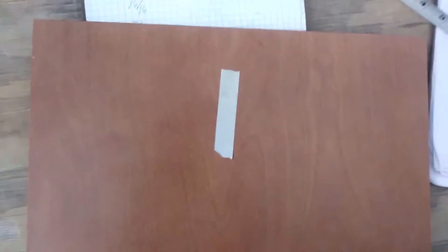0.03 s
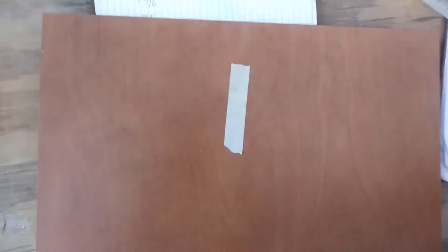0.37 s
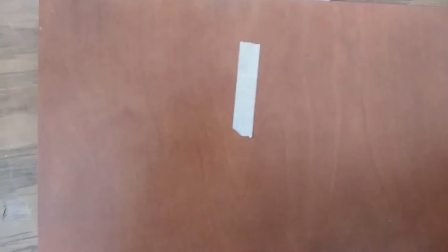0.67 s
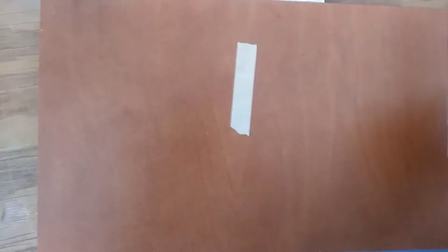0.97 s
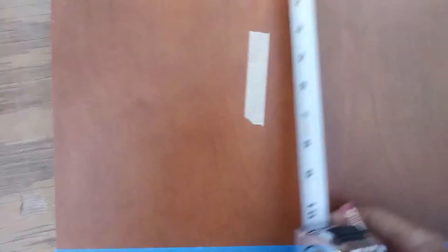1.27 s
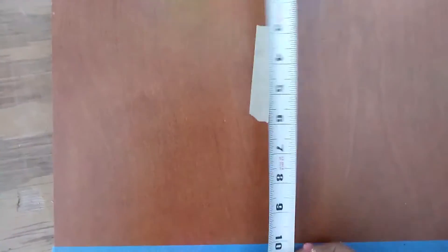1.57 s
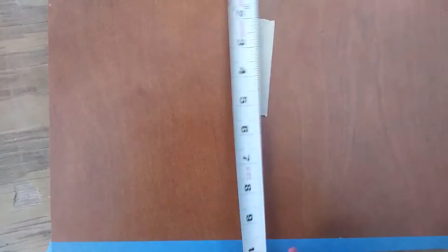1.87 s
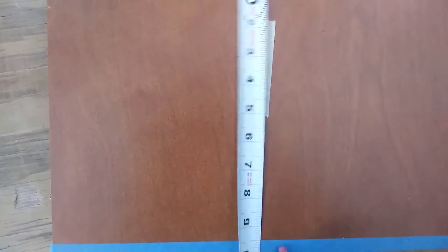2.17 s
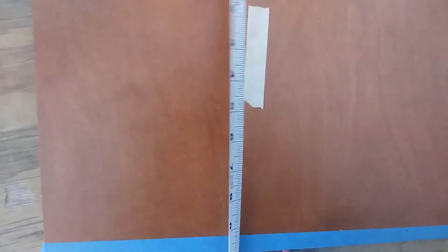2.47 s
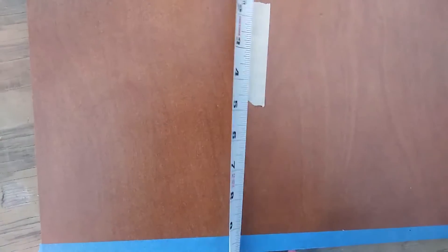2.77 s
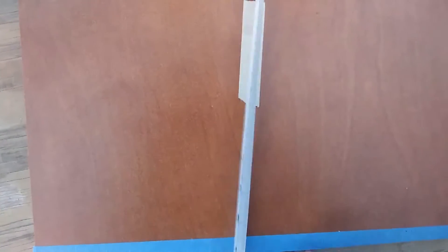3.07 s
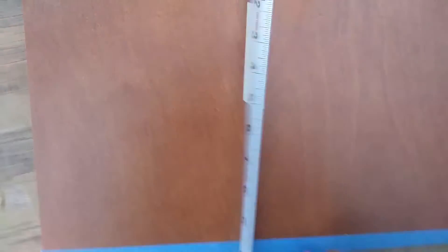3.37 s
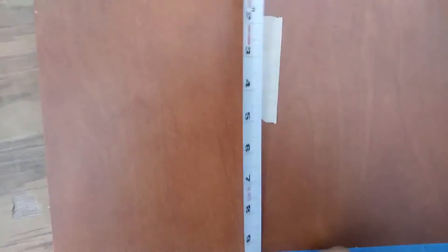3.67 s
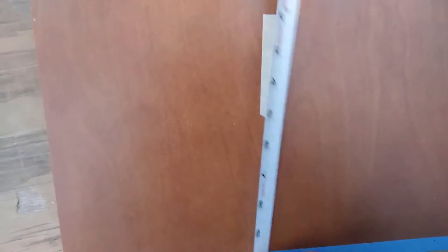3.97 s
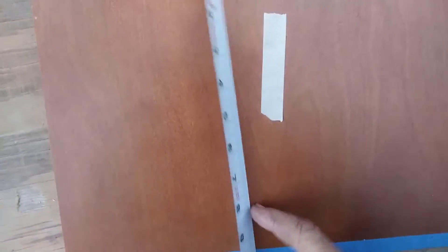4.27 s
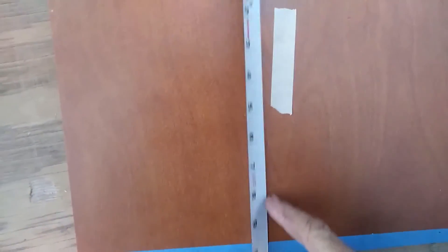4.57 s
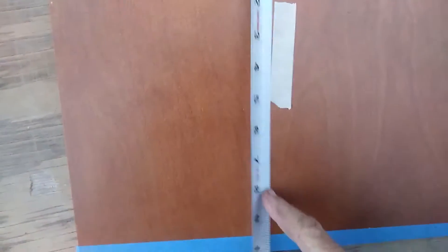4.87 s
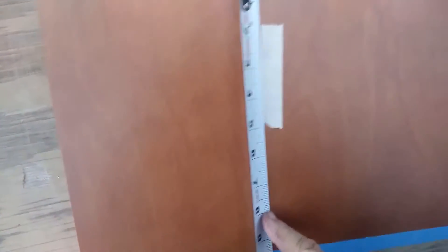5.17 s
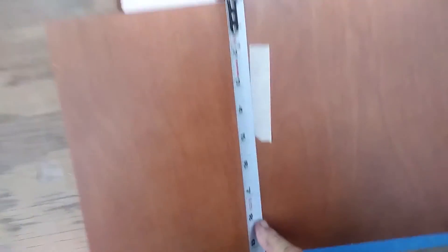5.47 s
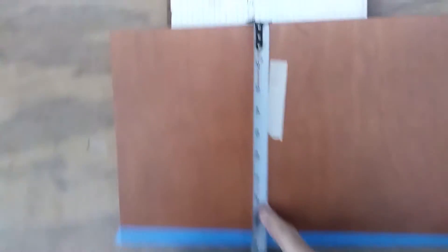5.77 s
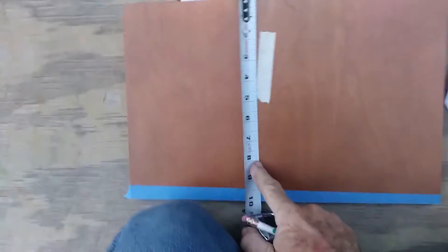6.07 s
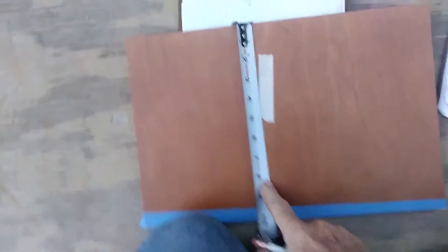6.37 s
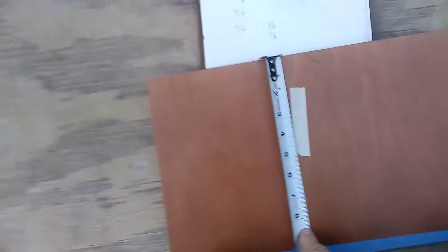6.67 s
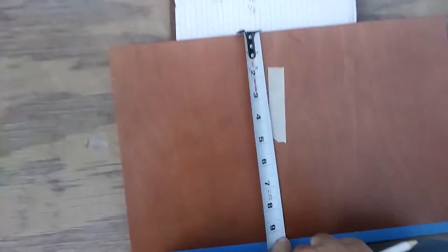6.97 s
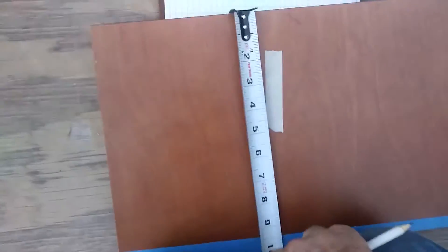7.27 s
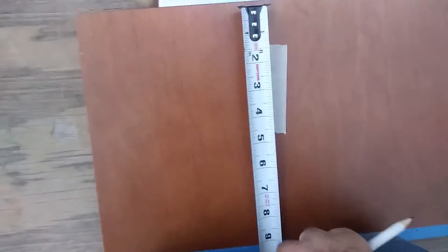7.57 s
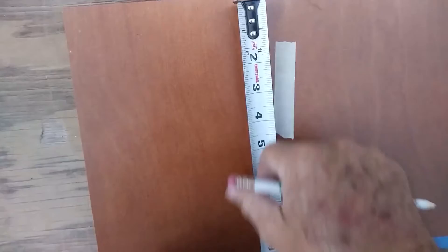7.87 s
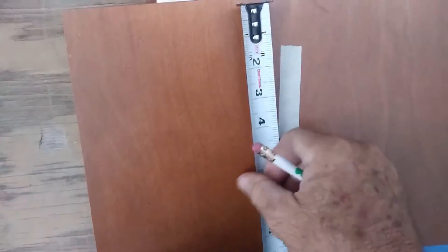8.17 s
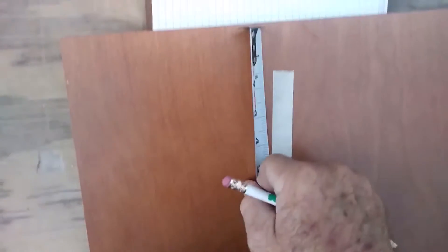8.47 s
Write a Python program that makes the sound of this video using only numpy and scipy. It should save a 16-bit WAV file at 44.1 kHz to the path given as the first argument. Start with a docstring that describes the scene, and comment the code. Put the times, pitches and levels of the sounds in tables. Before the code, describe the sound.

A steel tape measure is pulled out and shifted across a wooden board, with rustling, scraping and sharp metallic snaps.

```python
"""Workshop, close by: a steel tape measure is pulled out and shifted about on a wooden board.
The reel ticks and rings its spring; the arched blade buckles with sharp snaps and flutters as it bends.
Its edges scrape, crackle and squeak by stick-slip, and click against the case.
Case and hand knock and rub on the wood, ringing its low modes, over a faint room hum."""
import sys
import numpy as np
from scipy import signal
from scipy.fft import rfft, irfft
from scipy.io import wavfile
from scipy.ndimage import uniform_filter1d

SR = 44100
rng = np.random.default_rng(int(sys.argv[2]) if len(sys.argv) > 2 else 0)


def store_wav(level_fs):
    """Save 16-bit WAV to argv[1]."""
    pcm = np.round(np.clip(np.atleast_2d(level_fs), -1, 1) * 32767)
    wavfile.write(sys.argv[1], SR, pcm.T.astype(np.int16))


N = 384993
TIME_S, FREQ_HZ = np.arange(N) / SR, np.fft.rfftfreq(N, 1 / SR)
EVENT_N = SR // 4
AGE_S, EVENT_HZ = np.arange(EVENT_N) / SR, np.fft.rfftfreq(EVENT_N, 1 / SR)
ATTACK_S = 0.015  # friction onset

# Blade buckles: (time [s], ring [dB], hardness [dB], clash level [dB], brightness [dB], favoured [Hz])
BLADE_SNAPS = [(1.7975,-17,3.5,-11.5,0,680), (1.8161,-26,-9,-20,-4,680), (2.863,-16.5,4.5,-16,-10.5,1840),
               (2.9271,-33.5,5.5,-49,-27,694), (2.988,-28.5,5,-28.5,5,740), (3.162,-36.5,2.5,-44,-1,865),
               (3.288,-35,-12,-61,2,680), (3.8668,-14,8,-20.5,-10,1004), (3.886,-29.5,3.5,-37.5,15,960),
               (3.8966,-48,6,-49.5,-8,3130), (3.909,-35,13.5,-44.5,-19,2950), (3.9235,-41,2.5,-34,-8,1815),
               (4.028,-20,9,-21.5,-7.5,960), (4.506,-30,4.5,-55.5,-15,740), (4.519,-33,1,-57.5,-15,765),
               (4.5652,-32,-2,-30.5,0,720), (4.6204,-32,2.5,-42,-6,690), (4.688,-16.5,0,-18,1,830),
               (4.7386,-24.5,1,-15,0,694), (4.768,-31.5,3.5,-45.5,-1,863), (7.3597,-33.5,-3,-38,-17,852)]
# Hook and edge hit case and board: (time [s], level [dB], brightness [dB], case ring level [dB])
EDGE_CLICKS = [(0.4538,-30,-10.5,-58), (0.515,-54,-15,-36), (0.5535,-29,-5,-20.5), (0.5795,-31,-6,-38),
               (0.6952,-41.5,9,-32), (0.7164,-34,-30,-35), (0.8012,-28,7,-18), (0.822,-34,6,-46),
               (1.113,-27,8,-61), (1.3139,-37.5,-26,-64), (1.3775,-34.5,8,-64), (1.387,-36,8,-62),
               (1.539,-36.5,-9,-58), (1.711,-36,-8,-45), (1.8957,-24,9,-59), (1.903,-23,5,-55),
               (2.1209,-28,7,-38), (2.2318,-30,16,-27.5), (2.4551,-38,-9,-42.5), (2.6942,-48,-7,-42.5),
               (2.7393,-44.5,-12,-44), (3.1905,-34.5,0,-60), (3.2003,-28,5,-62), (3.2207,-23,7,-51),
               (3.2274,-23,-3,-27), (3.363,-49.5,5,-45), (3.4353,-25,5.5,-27), (3.517,-43,-3,-42),
               (3.8323,-35,2,-48), (4.0082,-40,-6,-47), (4.123,-29,1,-52), (4.365,-17,1,-65),
               (4.725,-26,-1,-62), (4.754,-20,1,-34), (4.9575,-29.5,-1,-29), (5.4848,-64.5,-16,-35),
               (6.157,-44,-12.5,-31.5), (6.4548,-66,-33,-41), (6.479,-45.5,-28,-48), (6.6104,-38.5,-32,-32),
               (6.7155,-52.5,-16,-43), (7.2516,-44.5,-1,-51.5), (7.2885,-56,-16,-40.5),
               (7.3766,-24.5,12,-41), (7.3848,-28.5,4,-65), (7.3975,-33,3,-53), (7.4056,-22,6,-36),
               (7.423,-26,5,-54), (7.481,-30.5,2,-43), (7.5222,-37,-3,-40), (7.605,-49.5,-15,-55),
               (7.6972,-46.5,-9,-51), (7.72,-47,-8,-52.5), (7.9392,-34,0,-42.5), (8.0957,-32,-29,-32),
               (8.1031,-27.5,-19,-24.5), (8.1125,-35.5,-20,-33.5), (8.2945,-41,-13,-20.5),
               (8.305,-31.5,-15,-29), (8.6042,-33.5,-1,-28.5), (8.628,-40.5,6,-39)]
# Reel ticks: (time [s], level [dB])
REEL_TICKS = [(0.8811,-27), (0.9086,-27.5), (0.93,-34), (0.9577,-29), (0.9878,-26.5), (1.018,-33),
              (1.0488,-26), (1.0784,-28.5), (1.103,-33), (1.133,-39), (1.1606,-30), (1.193,-31.5),
              (1.2577,-35.5)]
# Brief, clear tones near the end: (time [s], level [dB], favoured [Hz])
SHORT_TONES = [(8.225,-61,4630), (8.6092,-33,940), (8.613,-47,4550), (8.626,-37.5,4600), (8.7067,-41.5,680),
               (8.716,-41,4200)]
# Edge sticks and sings: (time [s], length [s], level [dB], pitch [Hz])
EDGE_CHIRPS = [(0.606,0.039,-42,3840), (0.671,0.0037,-36,3940), (1.374,0.015,-33,9460)]
# Blows on the board: (time [s], level [dB], favoured [Hz], push [s])
BOARD_KNOCKS = [(0.4621,-42,490,0.00067), (0.552,-49,280,0.001), (1.7985,-28,451,0.0023),
                (2.8635,-33.5,415,.0004), (3.857,-38.5,285,0.0071), (4.331,-34,283,0.0037),
                (4.365,-37,273,0.0016), (4.4526,-38,276,0.0085), (4.69,-42.5,215,.0005),
                (4.835,-38,285,0.0083), (4.954,-45,285,0.0087), (5.056,-43.5,610,0.00094),
                (5.164,-38,277,0.0042), (6.036,-44.5,480,0.00095), (6.265,-47,250,0.00069),
                (6.455,-27,300,0.00016), (6.478,-38,362,0.00082), (8.7063,-39.5,560,0.00019)]
# Pushes and pulls of the tape, levels at mid-stroke: (time [s], length [s], scrape [dB], flex [dB],
# rub [dB], swell over the stroke [dB], edge brightness [dB], squeak share [0-1])
TAPE_STROKES = [(0.44,0.16,-44.5,-76,-43,-3,-9,0.07), (0.623,0.019,-39.5,-35.5,-40,-1.5,-8,0),
                (0.686,0.17,-54.5,-48,-52,7,0,0), (0.873,0.44,-64,-52.5,-60,-16,-32,0.1),
                (1.265,0.032,-48,-58,-62,15,-6,0), (1.367,0.029,-43.5,-50,-48.5,2.5,-15,0),
                (1.443,0.024,-41.5,-44.5,-37,-1,-8,0.12), (1.503,0.079,-44,-50,-55,0,-12,0.2),
                (1.578,0.15,-67,-56.5,-66.5,-2,-16,0.33), (1.755,0.028,-49.5,-58,-60,6.5,-2.5,0.4),
                (1.802,0.15,-34,-34,-38.5,3,-4,0.03), (1.984,0.14,-44,-41,-45.5,10.5,-1,0.32),
                (2.206,0.14,-45.5,-37,-54,2,0.5,0), (2.367,0.037,-44,-53,-68,7.5,-14,0.14),
                (2.49,0.23,-65.5,-65.5,-73,3,-11,0.1), (2.757,.015,-57.5,-49.5,-63.5,-2.5,-6.5,0.4),
                (2.923,0.17,-46.5,-28.5,-62,3.5,1,0.26), (3.132,0.029,-66,-43.5,-53,4,-7,0.4),
                (3.19,0.054,-38,-43,-47,5.5,-20,0.27), (3.282,0.023,-49,-32.5,-28,-22,4,0),
                (3.349,0.25,-56,-53.5,-53,2,-5,0), (3.637,0.16,-75,-68.5,-70,0.5,-8,0.5),
                (3.81,0.028,-42,-50.5,-53,11,-25,0.2), (3.861,0.044,-53,-29,-41,-16,0,0.8),
                (4.089,0.028,-37.5,-38,-43,-3,-5,0.1), (4.12,0.059,-35,-43,-49,1,0,0.03),
                (4.185,0.021,-38.5,-43,-57.5,-4,-3,0.1), (4.22,0.02,-32,-43.5,-52,-7,0,0),
                (4.267,0.047,-39.5,-48,-50,-13,-7,0), (4.322,0.062,-37,-39,-46,7.5,-0.5,0),
                (4.431,0.17,-51.5,-53,-54,16,-13,0), (4.749,0.073,-52,-32,-64,-14,12,0),
                (4.819,0.031,-41,-55,-39.5,3,-8,0), (4.842,0.13,-39.5,-41,-45.5,-5,-12,0),
                (5.07,0.14,-53,-38,-47,3.5,-6.5,0.24), (5.392,0.12,-64.5,-49,-49.5,-1.5,0,0.2),
                (5.94,0.056,-66,-50.5,-46.5,6,-10,0.2), (6.008,0.24,-59.5,-42.5,-40,1,-6,0.2),
                (6.468,0.1,-70,-49,-47,-13,-2,0.35), (6.6,0.078,-62.5,-52,-56,3.5,-4,0),
                (7.225,0.042,-56.5,-53,-50.5,4.5,0,0.23), (7.371,0.18,-29.5,-58,-54,-17,-17,0.35),
                (7.933,0.011,-38,-41.5,-60,-2,-13,0.64), (8.136,0.079,-46,-54,-57,11,-3,0.54),
                (8.244,0.044,-38,-54,-53,-1.5,-9,0.3), (8.365,0.049,-71,-47,-66,6,-2,0.1),
                (8.553,0.04,-67,-43,-60,7,2,0.5), (8.625,0.049,-47,-51,-70,-7,-10,0.2),
                (8.705,0.027,-41,-44,-58,-15,-2,0.2)]
SCRAPE_COL, FLEX_COL, RUB_COL, BRIGHT_COL, SQUEAK_COL = 2, 3, 4, 6, 7
# Blade lifted off the wood: (time [s], freely ringing share [0-1])
BLADE_LIFT = [(0.5,0), (1.5,0.47), (1.8,0.9), (2.35,0.86), (2.95,0.83), (3.5,0.85), (4.0,0.96), (4.8,0.9),
              (5.1,0.57), (5.9,0.54), (8.7,0.34)]
# Case slides on the wood: (time [s], level [dB])
SLIDE_ENVELOPE = [(7.357,-62), (7.365,-47), (7.41,-30), (7.45,-40), (7.52,-46.5), (7.58,-58), (7.62,-72)]

# Modes: (frequency [Hz], level [dB], t60 [s])
BLADE_MODES = [(290, -20, .07), (365, -18, .06), (425, -11, .06), (560, -17, .05), (686, 0, .07),
               (765, -6, .07), (865, -4.5, .07), (962, -1.5, .085), (1130, -16, .05), (1360, -6, .055),
               (1410, -13, .05), (1820, -1, .045), (1980, -12, .05), (2300, -17, .04), (2480, -14, .045),
               (2650, -12, .04), (2950, -14, .055), (3135, -12, .05), (3480, -15, .045), (3745, -13, .055),
               (4200, -19, .04), (4430, -19, .045), (4750, -18, .04)]
TONE_MODES = [(396,8.5,0.13), (926,-2.5,0.071), (1400,11,0.032), (3170,-20,0.094), (4200,-1.5,0.1),
              (4750,9,0.035), (5840,4,0.064), (5670,-3,0.084), (6950,0,0.11)]
CASE_MODES = [(380, -0.5, 0.11), (506, -8.5, 0.068), (611, -6, 0.039), (750, -1, 0.035), (1013, -7.5, 0.13),
              (1140, -6.5, 0.032), (1370, -5, 0.077), (1580, -13.5, 0.046), (1600, -18, 0.0071),
              (2130, -5.5, 0.03), (2097, -6.5, 0.048), (2500, -9.5, 0.021)]
SPRING_MODES = [(1752,-4.5,0.054), (2650,-2,0.052), (3860,-1.5,0.11), (5000,-5,.06), (6650,-1,0.05),
                (6500,2.5,0.062), (9620,6,0.031), (9700,0,0.029), (10300,-3,.035), (12600,1,.03)]
BOARD_MODES = [(117.5, -18.5, 0.043), (162, -11, 0.017), (225, -3, 0.13), (280.4, 0.5, 0.11),
               (391, -8.5, 0.13), (452, -10, .06), (550, 0, 0.07), (735, 5.5, 0.17), (930, -11, 0.026)]
# Friction resonances: (frequency [Hz], width [Hz], level [dB])
EDGE_SQUEAK_PEAKS = [(3960, 57, -2.5), (4600, 360, -3), (4770, 290, -7.5), (5890, 84, -8), (6400, 200, -4)]
CASE_SLIDE_PEAKS = [(174,64,-3), (317,92,-3.5), (604,110,3), (904,29,-2), (1274,115,1.5), (2010,150,-1.5)]
# Noise spectra: (frequency [Hz], density [dB])
STEEL_SPECTRUM = [(120,-38.5), (350,-33.5), (900,-18.5), (1600,-10), (2200,-8.5), (3000,-4.5), (4100,0.5),
                  (5400,-4), (6800,-2), (8200,-4.5), (11500,-6.5), (13500,-15), (16000,-15.5)]
DEADENED_BLADE_SPECTRUM = [(120,-43), (300,-8), (500,-4.5), (720,0.5), (950,-1), (1150,-1.5), (1400,-3.5),
                           (1850,-11.5), (2300,-9), (4000,-14), (7000,-46.5), (16000,-54)]
LOOSE_PARTS_SPECTRUM = [(120,-38.5), (210,-15.5), (340,-13.5), (700,-2.5), (1150,1.5), (1650,-7),
                        (2150,-1.5), (2800,-8), (4000,-8.5), (7000,-27.5), (16000,-47.5)]
COIL_SPECTRUM = [(200,-10.5), (600,-10.5), (1000,0.5), (1300,-10), (1700,5), (2500,-7), (4000,4.5),
                 (6000,3), (10000,-18), (16000,-25)]
WOOD_RUB_SPECTRUM = [(30,-42.5), (85,-22.5), (130,-18), (200,-3.5), (300,15.5), (450,14), (700,0),
                     (1500,-33), (4000,-54)]
HUM_SPECTRUM = [(25,4), (70,-18), (110,-12.5), (170,-5), (230,-3), (330,-4), (500,-7), (1000,-6.5),
                (1700,-14.5), (3500,-17.5), (8000,-29), (11500,-27), (16000,-28)]
# Room decay: (frequency [Hz], t60 [s])
ROOM_DECAY = [(200, 0.24), (600, 0.02), (1500, 0.14), (4000, 0.16), (10000, 0.023), (16000, 0.26)]


def snaps(steel, swell_s=0.0027, rise_s=0.003, surge_s=0.013, sing_t60_s=0.24, pick_width_hz=60):
    """The arch pops through: steel clashes, bending modes rattle. Harder snaps are quicker and thinner."""
    out = np.zeros(N)
    hz, mode_db, t60_s = np.transpose(BLADE_MODES)
    for time_s, ring_db, hard_db, clash_db, bright_db, favoured_hz in BLADE_SNAPS:
        picked = np.exp(-((hz - favoured_hz) / pick_width_hz) ** 2)
        picked_db = mode_db + picked * (3.5 - 0.43 * mode_db)  # weak modes gain most
        modes = np.c_[hz, picked_db, t60_s * (1 + 0.45 * picked)]
        body = ring(modes, tilt_db=hard_db - 2.5, scatter_db=1.2, detune=0.006)
        body += amp(-19) * ring(CASE_MODES, detune=0.011)
        body *= chatter(EVENT_N, depth_db=2)
        body *= 1 + 1.8 * np.exp(-AGE_S / surge_s)  # wide first swings
        singing_modes = np.c_[hz, picked_db, np.full(len(hz), sing_t60_s)]
        body += amp(-23) * ring(singing_modes, tilt_db=hard_db - 7, detune=0.002)
        softness = 2 ** (-max(hard_db, -4) / 5)
        body *= 1 - np.exp(-AGE_S / (swell_s * softness))
        corner_hz = np.clip(330 * 2 ** (hard_db / 11), 100, 900)
        body = signal.sosfilt(signal.butter(2, corner_hz, "highpass", fs=SR, output="sos"), body)
        clash_t60_s = 0.077 * 2 ** (-hard_db / 20.5)
        fizz = clash(steel, bright_db, clash_t60_s, crack=0.39, crack_s=0.022)
        fizz *= 1 - np.exp(-AGE_S / (rise_s * softness))
        add(out, time_s, struck(body, ring_db) + struck(fizz, clash_db - 5.5))
    return out


def clicks(steel, rise_s=0.00089, lead_in_s=0.0024, bounce_s=0.0024, spike_s=0.00059, hand_damp_s=0.06):
    """Edge or reel ticks in the steel and bounces on the case. Duller contacts die sooner."""
    out = np.zeros(N)
    pull_speed = np.sin(np.linspace(0, np.pi, len(REEL_TICKS)))
    reel = [(time_s, db, 2.5 + 10 * speed, db - 23) for (time_s, db), speed in zip(REEL_TICKS, pull_speed)]
    for time_s, db, bright_db, case_db in list(EDGE_CLICKS) + reel:
        t60_s = 0.062 * 2 ** (bright_db / 37)
        contact = 1 + 2.3 * np.exp(-AGE_S / spike_s)
        tick = struck(clash(steel, bright_db, t60_s, crack=0.32, crack_s=0.0013) * contact, db)
        bounces = rng.standard_normal(EVENT_N) * np.exp(-AGE_S / bounce_s)
        shell = ring(CASE_MODES, tilt_db=0.057 * bright_db, scatter_db=5, detune=0.073)
        shell *= np.exp(-AGE_S / hand_damp_s)
        case = struck(signal.fftconvolve(bounces, shell)[:EVENT_N], case_db - 12)
        case += struck(clatter(), case_db - 6.5)
        add(out, time_s, (tick + case) * (1 - np.exp(-AGE_S / rise_s)))
        lead_in = struck(clash(steel, bright_db, t60_s), db - 17) * np.exp(-AGE_S / lead_in_s)
        add(out, time_s - EVENT_N / SR, lead_in[::-1])  # a few ms of hiss swell into the tick
    return out


def clash(steel, bright_db, t60_s, crack=0, crack_s=1):
    """High steel modes fizz, with an optional crack. Softer contacts roll off lower."""
    spot_db = ripple_db(points=170, depth_db=3.3)
    shade_db = bright_db * treble(EVENT_HZ, corner_hz=7500 * 2 ** (bright_db / 38))
    fizz = coloured(rng.standard_normal(EVENT_N), lookup(steel, EVENT_HZ) + spot_db + shade_db)
    fade = amp(-60 * AGE_S / max(t60_s, 0.01))
    return fizz * (fade * chatter(EVENT_N, depth_db=4.5) + crack * np.exp(-AGE_S / crack_s))


def steel_colour(step_hz=60, scatter_db=1.8):
    """Crowded high modes of the thin strip: (frequency [Hz], density [dB])."""
    hz = np.arange(20, SR / 2, step_hz)
    return np.c_[hz, lookup(STEEL_SPECTRUM, hz) + scatter_db * rng.standard_normal(len(hz))]


def clatter(rattle_s=0.014, knock_s=0.00042):
    """Loose case parts rattle in a broad, dry burst."""
    spot_db = ripple_db(points=200, depth_db=4)
    rattle = coloured(rng.standard_normal(EVENT_N), lookup(LOOSE_PARTS_SPECTRUM, EVENT_HZ) + spot_db)
    return rattle * (np.exp(-AGE_S / rattle_s) + 8.7 * np.exp(-AGE_S / knock_s))


def coil(rasp_s=0.012, ping_s=0.02, slide_db=-43.5, release_s=0.03):
    """Reel ticks ring the spring; coil turns rasp over one another and keep it ringing."""
    gain, ringing = np.zeros((2, N))
    for time_s, db in REEL_TICKS:
        add(gain, time_s, amp(db - 9.5) * np.exp(-AGE_S / rasp_s))
        ping = ring(SPRING_MODES, scatter_db=1, detune=0.011) * np.exp(-AGE_S / ping_s)
        add(ringing, time_s, struck(ping, db - 8))
    start_s, end_s = REEL_TICKS[0][0], REEL_TICKS[-1][0]
    pull = np.interp(TIME_S, [start_s, start_s + ATTACK_S, end_s - release_s, end_s], [0, 1, 1, 0])
    gain += amp(slide_db) * pull
    friction = slips(per_s=450, spread_db=5, smooth=0.33)
    spring = ring(SPRING_MODES, tilt_db=-3, scatter_db=0.5, detune=0.004)
    singing = unit_rms(excite(friction, spring))
    rasp = bending(coloured(friction, lookup(COIL_SPECTRUM, FREQ_HZ)))
    return ringing + gain * (rasp + amp(-5) * singing)


def scrape(steel, grain_s=0.0053):
    """The blade edge grates on board and case slot, with a thin squeak."""
    grain = rng.standard_normal(EVENT_N) * np.exp(-AGE_S / grain_s)
    power = excite(slips(per_s=700, spread_db=6, smooth=0.93) ** 2, grain ** 2)
    grit = np.sqrt(abs(power)) * rng.standard_normal(N) * chatter(N, depth_db=2)
    rasp = bending(coloured(grit, lookup(steel, FREQ_HZ)))
    squeak = unit_rms(filtered(rasp, resonances(EDGE_SQUEAK_PEAKS)))
    highs = filtered(rasp, treble(FREQ_HZ, corner_hz=7000))
    bite = amp(stroke_setting(BRIGHT_COL))
    rasp = (rasp + (bite - 1) * highs) / np.sqrt(0.73 + 0.078 * bite ** 2)  # about constant power
    share = np.clip(stroke_setting(SQUEAK_COL), 0, 1)
    return amp(1.5) * stroke_gain(SCRAPE_COL) * ((1 - share) * rasp + share * squeak)


def catches(steel, per_s=110, voices=6):
    """The sliding edge catches in small sharp ticks, harder under more pressure."""
    out = np.zeros(N)
    pressure = stroke_gain(SCRAPE_COL)
    for _ in range(voices):
        tick = clash(steel, bright_db=5, t60_s=0.034, crack=1.3, crack_s=0.00038)
        size = amp(4 * np.minimum(rng.exponential(1, N), 2))
        train = unit_rms((rng.random(N) < per_s / voices / SR) * size)
        out += excite(train * pressure, tick / np.linalg.norm(tick))
    return amp(-17) * out / np.sqrt(voices)


def flex(voices=5, drift_hz=2.6):
    """Creases run along the blade: lifted, it flutters in drifting modes; on the wood it rustles."""
    ringing = np.zeros(N)
    free = np.clip(np.interp(TIME_S, *np.transpose(BLADE_LIFT)), 0, 1)
    effort = stroke_gain(FLEX_COL)
    for k in range(voices):
        body = ring(BLADE_MODES, tilt_db=-0.5, scatter_db=1.5, detune=0.018)
        share = unit_rms(np.maximum(np.cos(2 * np.pi * (drift_hz * TIME_S + k / voices)), 0) ** 2)
        drive = slips(per_s=900, spread_db=4, smooth=0.5) * effort * np.sqrt(free) * share
        ringing += excite(drive, body / np.linalg.norm(body))
    ringing = filtered(ringing, amp(-6 * treble(FREQ_HZ, corner_hz=2400))) / np.sqrt(voices)
    creases = slips(per_s=260, spread_db=0.5, smooth=0.5)
    rustle = shifting(coloured(creases, lookup(DEADENED_BLADE_SPECTRUM, FREQ_HZ)))
    return amp(-3) * (ringing + effort * np.sqrt(1 - free) * rustle)


def chirps(waver=0.033):
    """The sticking edge bows one steel mode: a short, wavering squeak."""
    out = np.zeros(N)
    for time_s, length_s, db, hz in EDGE_CHIRPS:
        age_s = np.arange(0, length_s, 1 / SR)
        drift = unit_rms(uniform_filter1d(rng.standard_normal(EVENT_N), size=90))[:len(age_s)]
        tone = np.sin(2 * np.pi * np.cumsum(hz * (1 + waver * drift)) / SR)
        add(out, time_s, amp(db) * unit_rms(tone * np.sin(np.pi * age_s / length_s)))
    return out


def knocks(lowpass_hz=1100, detune=0.06):
    """Soft blows ring the board. A quick one stays and damps it; a slow push lets it ring."""
    out = np.zeros(N)
    hz, mode_db, t60_s = np.transpose(BOARD_MODES)[:, :, None]
    lowpass = signal.butter(3, lowpass_hz, fs=SR, output="sos")
    for time_s, db, favoured_hz, push_s in BOARD_KNOCKS:
        scatter_db, bend = rng.standard_normal((2, len(BOARD_MODES), 1))
        picked_db = mode_db + pick_db(hz, favoured_hz, focus_db=11, width_hz=45)  # set by the spot hit
        level = amp(picked_db + scatter_db - 60 * AGE_S / t60_s)
        body = (level * np.cos(2 * np.pi * hz * (1 + detune * bend) * AGE_S)).sum(0)
        damp_s = 0.012 + 29 * push_s
        body *= (1 - np.exp(-AGE_S / push_s)) * np.exp(-AGE_S / damp_s)
        add(out, time_s, struck(signal.sosfilt(lowpass, body), db))
    return out


def case_slide():
    """The case slides briefly; friction sounds through hollow resonances of case and board."""
    friction = slips(per_s=420, spread_db=6, smooth=0.62)
    level_db = np.interp(TIME_S, *np.transpose(SLIDE_ENVELOPE), left=-200, right=-200)
    return amp(level_db) * unit_rms(filtered(friction, resonances(CASE_SLIDE_PEAKS)))


def rub(voices=4, drift_hz=1.6):
    """Hand and case drag dully on the wood; its low modes shift as the pressure moves."""
    drag = coloured(slips(per_s=120, spread_db=14, smooth=0.14), lookup(WOOD_RUB_SPECTRUM, FREQ_HZ))
    ringing = np.zeros(N)
    for k in range(voices):
        board = ring(BOARD_MODES, detune=0.07)
        share = np.maximum(np.cos(2 * np.pi * (drift_hz * TIME_S + k / voices)), 0)
        ringing += excite(slips(per_s=350, spread_db=10, smooth=0.6) * share, board)
    return stroke_gain(RUB_COL) * (0.31 * drag + 0.35 * unit_rms(ringing))


def short_tones(rise_s=0.00094):
    """Brief, clear ringing tones near the end, each around a favoured pitch."""
    out = np.zeros(N)
    hz, mode_db, t60_s = np.transpose(TONE_MODES)
    for time_s, db, favoured_hz in SHORT_TONES:
        picked_db = mode_db + pick_db(hz, favoured_hz, focus_db=9, width_hz=150)
        tone = ring(np.c_[hz, picked_db, t60_s], scatter_db=1, detune=0.003)
        add(out, time_s, struck(tone * (1 - np.exp(-AGE_S / rise_s)), db))
    return out


def room(x, wet_db=-13, tail_n=SR // 2, gap_n=SR // 150):
    """Adds sparse reflections from bench and walls; decay varies by band."""
    taps = rng.standard_normal(tail_n) * (rng.random(tail_n) < 0.08) * (np.arange(tail_n) > gap_n)
    hz, age_s, bands = signal.stft(taps, SR, nperseg=256)
    decay = amp(-60 * age_s / lookup(ROOM_DECAY, hz)[:, None])
    tail = signal.istft(bands * decay, SR, nperseg=256)[1]
    return x + amp(wet_db) * excite(x, tail / np.linalg.norm(tail))


def room_hum(level_db=-60):
    """Faint, steady low noise."""
    return amp(level_db) * coloured(rng.standard_normal(N), lookup(HUM_SPECTRUM, FREQ_HZ))


def ring(modes, tilt_db=0, scatter_db=2, detune=0.01):
    """Decaying modes, varied per call; tilt is per octave above 850 Hz."""
    hz, db, t60_s = np.transpose(modes)[:, :, None]
    size, bend, phase = rng.standard_normal((3, len(modes), 1))
    octaves = np.log2(np.maximum(hz / 850, 1))
    level = amp(db + tilt_db * octaves + scatter_db * size - 60 * AGE_S / t60_s)
    return (level * np.sin(2 * np.pi * (hz * (1 + detune * bend) * AGE_S + phase))).sum(0)


def pick_db(hz, favoured_hz, focus_db, width_hz):
    """Lifts modes near the favoured frequency and cuts distant ones."""
    near = np.exp(-((hz - favoured_hz) / width_hz) ** 2)
    return focus_db * (near - abs(np.log2(hz / favoured_hz)))


def ripple_db(points, depth_db):
    """Random spectral ripple of one contact."""
    return depth_db * np.interp(EVENT_HZ, np.linspace(0, SR / 2, points), rng.standard_normal(points))


def slips(per_s, spread_db, smooth):
    """Stick-slip: tiny uneven catches over smooth friction, at a steady level."""
    caught = rng.random(N) < per_s / SR
    size = amp(spread_db * np.minimum(rng.exponential(1, N), 3.5))
    hiss = rng.standard_normal(N)
    train = unit_rms(caught * size * np.sign(hiss)) + smooth * hiss
    return train / np.sqrt(uniform_filter1d(train ** 2, size=1800) + 1e-9)


def chatter(samples, depth_db):
    """Gain of an edge bouncing in and out of contact every few milliseconds."""
    return unit_rms(amp(depth_db * unit_rms(uniform_filter1d(rng.standard_normal(samples), size=220))))


def stroke_gain(column, release_s=0.023):
    """Gain of one kind of friction: each stroke sets in, swells or fades, and dies."""
    gain = np.zeros(N)
    for row in TAPE_STROKES:
        time_s, length_s, swell_db = row[0], row[1], row[5]
        age_s = np.arange(round(length_s * SR) + EVENT_N) / SR
        attack = np.minimum(age_s / ATTACK_S, 1)
        hold = amp(row[column] + swell_db * (np.minimum(age_s / length_s, 1) - 0.5))
        release = np.exp(-np.maximum(age_s - length_s, 0) / release_s)
        add(gain, time_s, attack * hold * release)
    return gain


def stroke_setting(column):
    """An edge property, held until the next stroke."""
    rows = np.array(TAPE_STROKES)
    latest = np.maximum(np.searchsorted(rows[:, 0], TIME_S) - 1, 0)
    return uniform_filter1d(rows[latest, column], size=400)


def bending(x):
    """Resonances of bending steel come and go in narrow and broad patches."""
    bands = signal.stft(x, nperseg=512, noverlap=384)[2]
    gain_db = 3 * patches(bands.shape, bins=3, frames=24) + 2.4 * patches(bands.shape, bins=30, frames=14)
    return unit_rms(signal.istft(bands * amp(gain_db), nperseg=512, noverlap=384)[1][:N])


def shifting(x):
    """Narrow, brief resonances change as the contact point travels."""
    bands = signal.stft(x, nperseg=1024, noverlap=768)[2]
    gain_db = 6 * patches(bands.shape, bins=3, frames=9)
    return unit_rms(signal.istft(bands * amp(gain_db), nperseg=1024, noverlap=768)[1][:N])


def patches(shape, bins, frames):
    """Smooth random field over frequency and time."""
    field = uniform_filter1d(rng.standard_normal(shape), size=bins, axis=0)
    return unit_rms(uniform_filter1d(field, size=frames, axis=1))


def resonances(peaks):
    """Gain per bin of summed peaks."""
    return sum(amp(db) / (1 + (2 * (FREQ_HZ - hz) / width_hz) ** 2) for hz, width_hz, db in peaks)


def treble(hz, corner_hz):
    """Rises from 0 to 1 across the corner."""
    return hz ** 4 / (hz ** 4 + corner_hz ** 4)


def lookup(table, hz):
    """Interpolates on a log-frequency axis."""
    table_hz, value = np.transpose(table)
    return np.interp(np.log(hz + 1), np.log(table_hz + 1), value)


def coloured(x, db):
    """Filters by dB per bin; rms 1."""
    return unit_rms(filtered(x, amp(db)))


def struck(x, db):
    """Sets the rms of the first 20 ms to db."""
    return amp(db) * x / np.sqrt(np.mean(x[:SR // 50] ** 2) + 1e-20)


def filtered(x, gain):
    return irfft(rfft(x) * gain, len(x))


def excite(drive, response):
    return signal.oaconvolve(drive, response)[:N]


def add(mix, time_s, sound):
    part = mix[round(time_s * SR):][:len(sound)]
    part += sound[:len(part)]


def unit_rms(x):
    return x / np.sqrt(np.mean(x ** 2) + 1e-20)


def amp(db):
    return 10 ** (np.asarray(db) / 20)


def scene():
    """Tape measure and board in the room, over the hum; mono."""
    steel = steel_colour()
    handling = snaps(steel) + clicks(steel) + coil() + case_slide() + short_tones() + chirps() + knocks()
    handling += scrape(steel) + catches(steel) + flex() + rub()
    hum = room_hum()
    return (room(handling) + hum)[None]


def record(dry, highpass_hz=130, lowpass_hz=16000):
    """Soft overload on the loudest snaps, bass cut, band limit."""
    highpass = signal.butter(3, highpass_hz, "highpass", fs=SR, output="sos")
    lowpass = signal.firwin(401, lowpass_hz, window=("kaiser", 9), fs=SR)
    thin = signal.sosfilt(highpass, np.tanh(dry))
    return signal.oaconvolve(thin, lowpass[None], "same")


dry = scene()
out = record(dry)
store_wav(out)
```